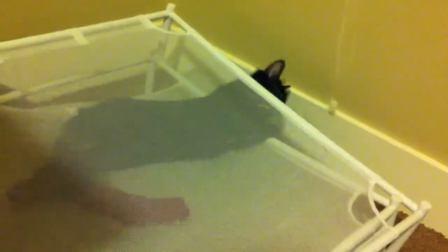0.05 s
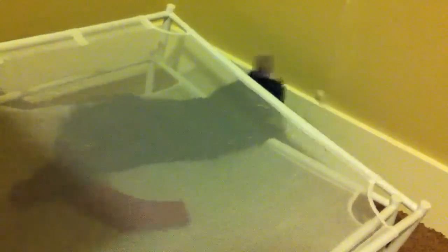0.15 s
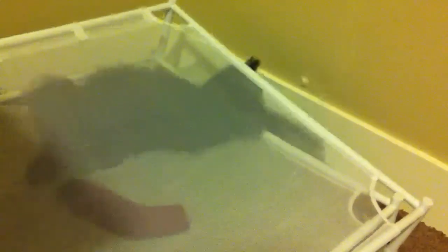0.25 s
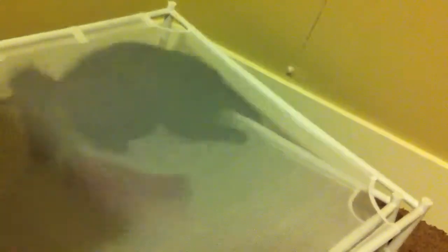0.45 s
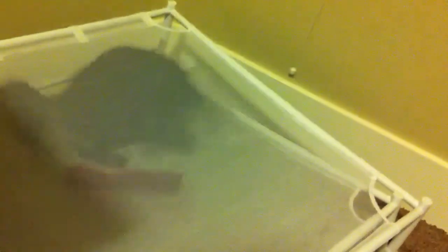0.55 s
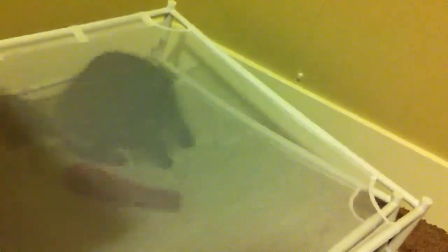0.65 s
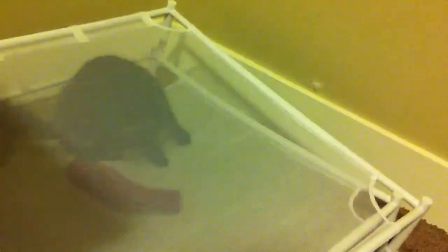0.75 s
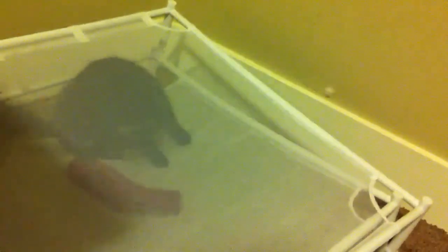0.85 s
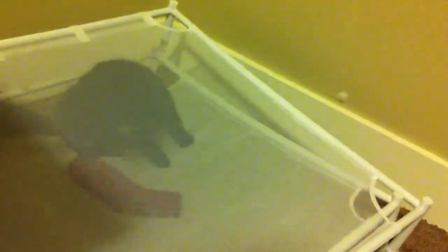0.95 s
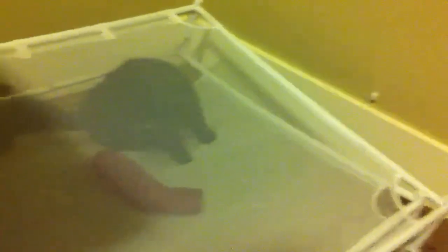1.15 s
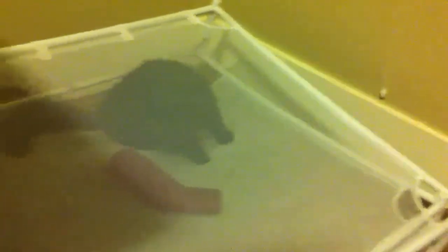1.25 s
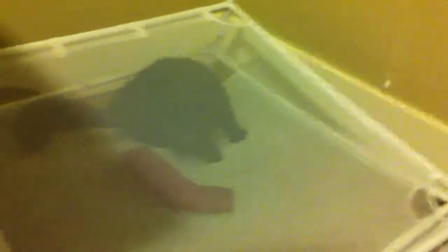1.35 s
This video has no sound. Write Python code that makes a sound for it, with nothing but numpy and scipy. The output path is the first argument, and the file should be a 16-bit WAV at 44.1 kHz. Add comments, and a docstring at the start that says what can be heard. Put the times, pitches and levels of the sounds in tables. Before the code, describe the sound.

Knocks of a plastic and metal drying rack under a kitten. Faint rustle and small taps with soft thumps from 0.15 s, a sharper click at 0.31 s, then the loudest hard knock at 0.45 s with a low thud and brief metallic rattle. Sparse light ticks follow at 0.7, 0.88 and 1.06 s; dull soft microphone bumps from 1.18 to 1.34 s. Small live room, low steady hiss.

```python
"""Kitten on a drying rack

A kitten clambers about on the mesh shelf of a drying rack in a small room. Steps thump the frame (swings,
modes), plastic joints click and knock (band-passed chatter), and hard knocks set the metal rods ringing (noise-
fed modes). The mesh rustles (random grains); near the end soft bumps reach the microphone (damped pushes). A
faint hiss (coloured noise) lies under it all."""
import sys
import numpy as np
from scipy import signal
from scipy.fft import rfft, irfft, next_fast_len
from scipy.io import wavfile
from scipy.ndimage import uniform_filter1d

SR = 44100
rng = np.random.default_rng(int(sys.argv[2]) if len(sys.argv) > 2 else 0)


def int16_out(signal):
    """Quantize to a 16-bit WAV file."""
    q = np.round(np.clip(np.atleast_2d(signal).T, -1, 1) * 32767)
    wavfile.write(sys.argv[1], SR, q.astype(np.int16))


N = 61739
TIME_S = np.arange(N) / SR

# Joints and claws click: t/s, level before colouring/dB, length/s, low edge/Hz, high edge/Hz
CLICKS = [(.0410, -55, 0.0098, 1800, 14600), (0.154, -56, 0.0021, 520, 2180),
          (0.199, -46.5, 0.003, 910, 7100), (0.2084, -51, 0.0074, 665, 3000),
          (0.2136, -40, 0.0014, 770, 2850), (0.2822, -53, 0.0041, 625, 2450),
          (0.2865, -43, 0.00067, 1490, 13000), (.3056, -39, 0.0036, 2480, 12300),
          (.3110, -28, 0.0031, 1620, 6150), (0.3113, -41.5, 0.0033, 6400, 14100),
          (0.341, -47, 0.005, 1470, 5800), (0.3727, -47, 0.0035, 1480, 6600),
          (0.3815, -49, 0.0039, 1190, 6700), (0.3974, -40, 0.0031, 840, 2780),
          (0.443, -41.5, .003, 1010, 4120), (0.4452, -29.5, 0.0012, 1780, 13400),
          (.4560, -21, 0.0018, 1590, 8600), (0.4562, -37, 0.002, 8700, 14600),
          (.4570, -49.5, 0.0047, 473, 1250), (0.4576, -22, .002, 3690, 4970),
          (0.4655, -22, 0.0011, 3880, 5050), (0.4763, -40, 0.0034, 3230, 5760),
          (.4770, -56, 0.0036, 492, 1170), (0.61, -63, 0.0073, 610, 2500),
          (0.7013, -46.5, 0.002, 810, 3200), (0.7142, -49, 0.0038, 860, 4700),
          (0.8346, -62, 0.0045, 1150, 3950), (0.8774, -39.5, 0.0023, 1860, 15300),
          (.8942, -45.5, 0.0024, 1687, 4320), (0.9487, -46, 0.0026, 1760, 4350),
          (1.0578, -45.5, 0.0017, 1480, 3470), (1.2970, -50, 0.0022, 1330, 2970),
          (1.2980, -49, 0.0018, 4830, 5800), (1.336, -52, 0.0012, 1070, 4400),
          (1.351, -54.5, 0.0029, 1150, 3270)]
# Colour of the plastic: f/Hz, gain/dB
PLASTIC_COLOUR = [(300, 12.5), (900, 2.5), (1500, -4.5), (1950, -3.5), (2450, -4.5), (2900, -2), (3300, -6),
                  (4300, -4.5), (5000, -9), (5800, -3), (7000, -11), (8300, -8.5), (9800, -11), (13500, -6),
                  (16000, -8)]
CLICK_RELEASE_S = 0.0011  # fade of the chatter
SNAP_RATIO = 1.31  # first touch against the chatter
EVEN_HZ = 250  # smoothing width of burst spectra

# Weight lands on mesh and frame: t/s, envelope peak/dB, settled pitch/Hz, swell time/s
THUMPS = [(.1515, -45, 309, 0.0026), (.1570, -45.5, 190, 0.003), (0.165, -49.5, 172, 0.0059),
          (0.1987, -37.5, 209.6, 0.0057), (.2110, -46.5, 258, 0.0032), (0.2249, -56, 203, 0.0065),
          (0.2329, -48.5, 318, 0.0048), (.2760, -51, 260, 0.004), (0.4017, -42, 240, 0.0037),
          (.4150, -46, 241, 0.0052), (0.448, -35, 237.6, 0.0026), (0.4563, -26.5, 213.2, 0.0047),
          (.4575, -46, 408, 0.0054), (.4810, -37, 303.5, 0.0041), (0.49, -40, 204, 0.0058),
          (.5700, -47.5, 213.4, 0.0055), (0.597, -52, 234, 0.011), (0.8781, -57.5, 264, 0.0047)]
# Frame modes: f/Hz, relative level/dB, t60/s
FRAME_MODES = [(133.4, -3, 0.31), (155.3, -2, 0.33), (216.1, 3.5, 0.11), (339, -1.5, .17), (366, -1, 0.14),
               (394, -1.5, 0.11), (476, 2, 0.1)]
FRAME_DB = -50
THUMP_SHARP_RATIO, SAG_S = 0.45, 0.0044  # initial excess pitch and its decay

# Rods are shaken: t/s, drive level/dB
ROD_HITS = [(.3111, -69), (.4562, -39)]
# Rod modes: f/Hz, relative level/dB, t60/s
ROD_MODES = [(3376, -13.5, 0.046), (3586, -17, .08), (3860, -19, 0.11), (4100, 2, .08), (4320, -22, 0.059),
             (4336, -5, 0.073), (4340, -3.5, 0.07), (4660, -6, 0.037), (4660, -7.5, 0.08),
             (4890, -3.5, 0.065), (4860, -10, 0.054), (5050, -3.5, 0.035), (5350, 1.5, 0.048),
             (5880, -6, 0.031)]
ROD_RATTLE_S = 0.039  # decay of the shaking

# Mesh rubbing: t/s, level/dB
RUBBING = [(0, -66), (.06, -67), (.12, -69), (.18, -63), (.22, -66), (.27, -64.5), (.33, -56.5), (.38, -61),
           (.43, -58.5), (.5, -60), (.62, -69), (.8, -69), (1.2, -75), (1.39, -70)]
# Colour of the mesh: f/Hz, gain/dB
MESH_COLOUR = [(100, -11.5), (300, 10), (600, 0.5), (1500, 1.5), (3000, 1.5), (5500, 1), (9000, -5),
               (16000, -15.5)]
FIBRES_PER_S = 5000

# Soft bumps on the microphone's case: t/s, peak force/dB, contact time/s
BUMPS = [(1.1845, -51, .0011), (1.1974, -57, .0011), (1.2158, -46, 0.0017), (1.2343, -48.5, 0.0014),
         (1.2565, -52, 0.0014), (1.2683, -50, 0.0021), (1.3081, -50.5, .0018), (1.3385, -42, 0.0026)]
CASE_HZ, CASE_WIDTH_HZ = 157, 93

# Room response: f/Hz, relative level/dB, t60/s
ROOM = [(150, 4.5, 0.21), (380, 7.5, 0.45), (926, -5, 0.36), (2180, -5, 0.37), (4570, -9.5, 0.33),
        (8100, -8, 0.33), (15100, -6, 0.27)]
ROOM_DELAY_S, EARLY_DB, EARLY_S = .004, 5, 0.013
THUMP_ROOM_DB = -18.5  # thump send to the room

# Hiss spectrum: f/Hz, relative density/dB
HISS_COLOUR = [(18, -10), (30, 17.5), (59, -7.5), (141, 1), (319, 1), (426, -2.5), (584, -3.5), (988, -6.5),
               (1070, -4.5), (1590, -9), (1910, -10.5), (2480, -12), (16000, -12.5)]
HISS_DB = -66.5

BASS_CUT_HZ, CUTOFF_HZ = 90, 16000


def joints():
    """Each click is a snap followed by a few milliseconds of chatter, coloured by the plastic."""
    out = np.zeros(N + SR)
    age_s = np.arange(SR // 32) / SR
    for t_s, db, length_s, low_hz, high_hz in CLICKS:
        release = np.exp(-np.maximum(age_s - length_s, 0) / CLICK_RELEASE_S)
        chatter = rng.choice([-1., 1.], len(age_s)) * release
        chatter[0] = SNAP_RATIO * np.sqrt(length_s * SR) / 2
        click = band(even(chatter, EVEN_HZ), low_hz, high_hz, order=3)
        # unit rms if spread over length_s
        click *= np.sqrt(length_s * SR / np.sum(click ** 2))
        start = int(t_s * SR)
        out[start:start + len(age_s)] += from_db(db) * click
    return colour(out[:N], PLASTIC_COLOUR)


def frame():
    """Each thump swells and dies within a few swings, sagging in pitch, and leaves the frame's modes ringing."""
    swings = 0
    for t_s, db, hz, swell_s in THUMPS:
        age_s = np.maximum(TIME_S - t_s, 0)
        sag_s = THUMP_SHARP_RATIO * SAG_S * (1 - np.exp(-age_s / SAG_S))
        cycles = hz * (age_s + sag_s)
        envelope = (age_s / swell_s * np.exp(1 - age_s / swell_s)) ** 2
        swings = swings + from_db(db) * envelope * np.sin(2 * np.pi * cycles)
    return swings + from_db(FRAME_DB) * ring(swings, FRAME_MODES)


def rods():
    """Hard knocks leave the rods rattling in their sockets, feeding a cluster of close, high modes."""
    shaking = 0
    for t_s, db in ROD_HITS:
        decay = np.exp(-np.maximum(TIME_S - t_s, 0) / ROD_RATTLE_S)
        shaking = shaking + from_db(db) * (TIME_S > t_s) * decay
    # independent noise for each mode
    ringing = sum(ring(shaking * rng.standard_normal(N), [mode]) for mode in ROD_MODES)
    return ringing / np.sqrt(ROD_RATTLE_S * SR / 2)


def mesh():
    """Fibres slip under the paws in dense tiny grains."""
    slips = rng.random(N) < FIBRES_PER_S / SR
    grains = slips * rng.standard_normal(N)
    level_db = np.interp(TIME_S, *np.transpose(RUBBING))
    return from_db(level_db) * rms_one(colour(grains, MESH_COLOUR))


def bumps():
    """Smooth contact forces drive a damped resonance of the case: dull, dry pushes."""
    force = sum(from_db(db) * push(t_s, contact_s) for t_s, db, contact_s in BUMPS)
    damping = [1, 2 * np.pi * CASE_WIDTH_HZ, (2 * np.pi * CASE_HZ) ** 2]
    return signal.lfilter(*signal.bilinear([1, 0, 0], damping, SR), force)


def room():
    """Impulse response: noise bands, strong early reflections, then a tail with its own decay in each band."""
    edges_hz = np.geomspace(110, 17000, 12)
    white = rng.standard_normal((2, N))  # neighbouring bands alternate
    age_s = np.maximum(TIME_S - ROOM_DELAY_S, 0)
    early = 1 + from_db(EARLY_DB) * np.exp(-age_s / EARLY_S)
    response = 0
    for k, (low_hz, high_hz) in enumerate(zip(edges_hz, edges_hz[1:])):
        hz = np.sqrt(low_hz * high_hz)
        decay = np.exp(-np.log(1000) * age_s / at_hz(ROOM, hz, axis=2))
        burst = (white[k % 2] * (age_s > 0) * decay * early)[:SR // 2]
        response = response + from_db(at_hz(ROOM, hz)) * band(even(burst, EVEN_HZ / 2), low_hz, high_hz)
    return response


def hiss():
    """Steady coloured noise."""
    return from_db(HISS_DB) * rms_one(colour(rng.standard_normal(N), HISS_COLOUR))


def ring(force, modes):
    """Decaying sines set off by a force: one two-pole resonator per mode."""
    out = 0
    for hz, db, t60_s in modes:
        r = from_db(-60 / (t60_s * SR))
        w = 2 * np.pi * hz / SR
        poles = [1, -2 * r * np.cos(w), r * r]
        out = out + from_db(db) * signal.lfilter([0, np.sin(w)], poles, force + 1e-18)
    return out


def push(start_s, length_s):
    """A smooth contact of height 1."""
    return np.sin(np.pi * np.clip((TIME_S - start_s) / length_s, 0, 1)) ** 2


def even(noise, width_hz):
    """Level out a burst's spectral peaks and dips that are broader than the given width."""
    size = 2 * len(noise)
    spectrum = rfft(noise, size)
    bins = max(int(width_hz * size / SR), 1)
    power = uniform_filter1d(np.abs(spectrum) ** 2, bins, mode="mirror")
    return irfft(spectrum / np.sqrt(power + 1e-12))[:len(noise)]


def colour(x, points):
    """Minimum-phase filter with the given spectrum: nothing sounds early."""
    size = 2 * next_fast_len(N)
    gain = from_db(at_hz(points, np.fft.rfftfreq(size, 1 / SR)))
    cepstrum = irfft(np.log(gain))
    # fold onto positive time
    cepstrum[1:size // 2] *= 2
    cepstrum[size // 2 + 1:] = 0
    return irfft(rfft(x, size) * np.exp(rfft(cepstrum)))[:N]


def band(x, low_hz, high_hz, order=2):
    """Causal Butterworth band-pass."""
    high_hz = min(max(high_hz, low_hz * 1.2), SR * .45)
    sos = signal.butter(order, [low_hz, high_hz], "band", fs=SR, output="sos")
    return signal.sosfilt(sos, x + 1e-18)


def at_hz(points, hz, axis=1):
    """Read a table column on a log-frequency axis."""
    table = np.array(points)
    return np.interp(np.log(np.maximum(hz, 1)), np.log(table[:, 0]), table[:, axis])


def rms_one(x):
    """Scale to unit rms."""
    return x / np.sqrt(np.mean(x ** 2) + 1e-20)


def from_db(db):
    """Decibels to amplitude gain."""
    return 10 ** (np.asarray(db) / 20)


def scene():
    """Clicks and thumps excite the room; rods, mesh, bumps and hiss are added dry."""
    clicks, thumps = joints(), frame()
    reverb = signal.fftconvolve(clicks + from_db(THUMP_ROOM_DB) * thumps, room())[:N]
    return (clicks + thumps + rods() + reverb + mesh() + bumps() + hiss())[None]


def record(dry):
    """The microphone thins the deep bass; a steep low-pass cuts the top."""
    bass_cut = signal.butter(2, BASS_CUT_HZ, "high", fs=SR, output="sos")
    top_cut = signal.ellip(12, .1, 80, CUTOFF_HZ, fs=SR, output="sos")
    return signal.sosfilt(top_cut, signal.sosfilt(bass_cut, dry))


dry = scene()
out = record(dry)
int16_out(out)
```